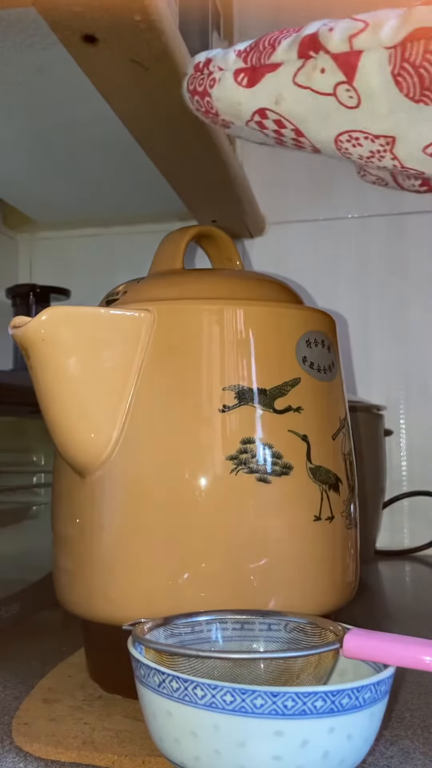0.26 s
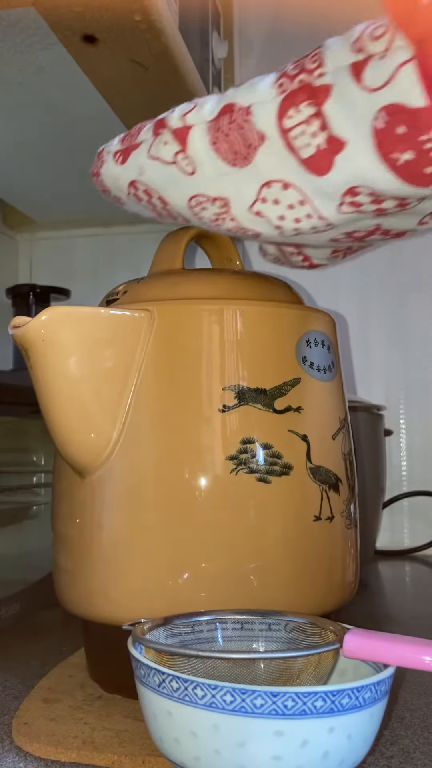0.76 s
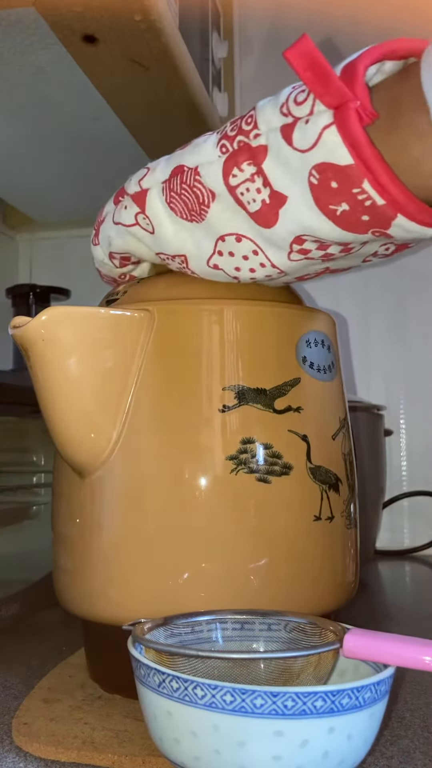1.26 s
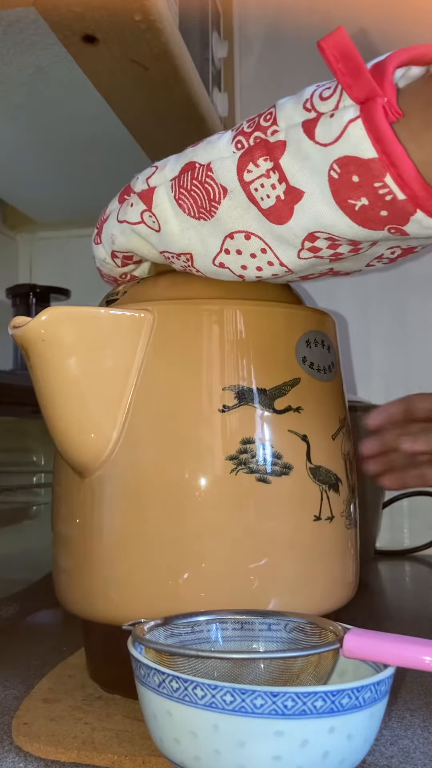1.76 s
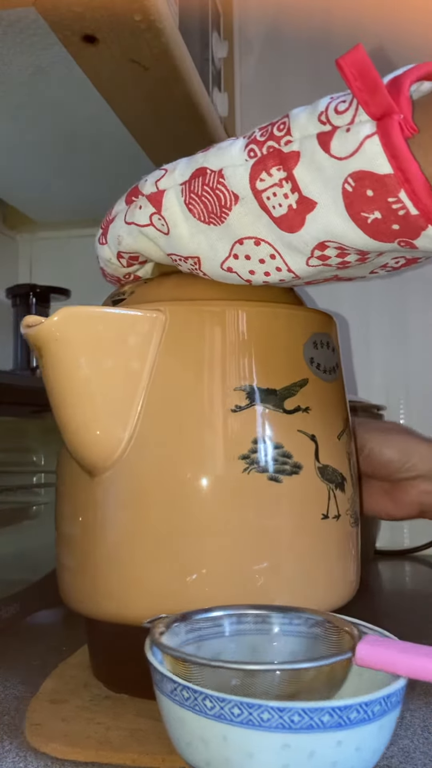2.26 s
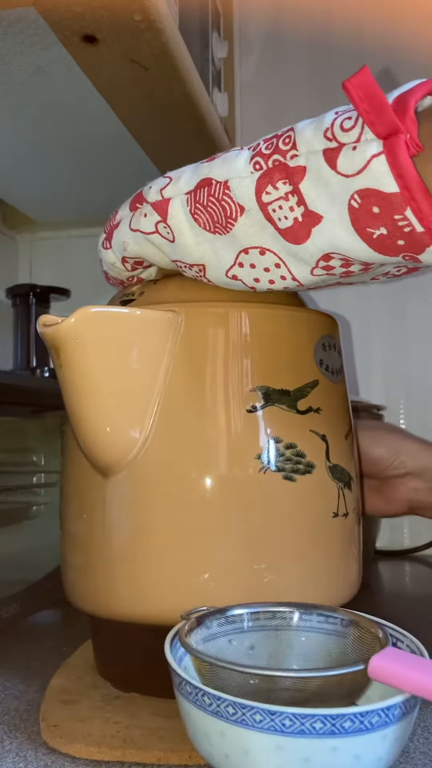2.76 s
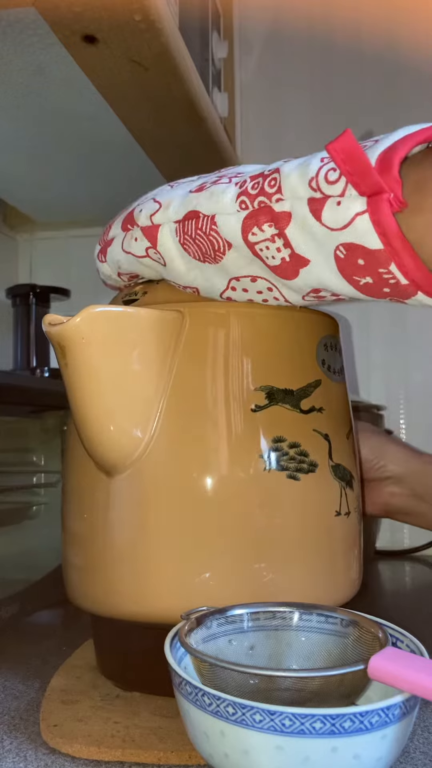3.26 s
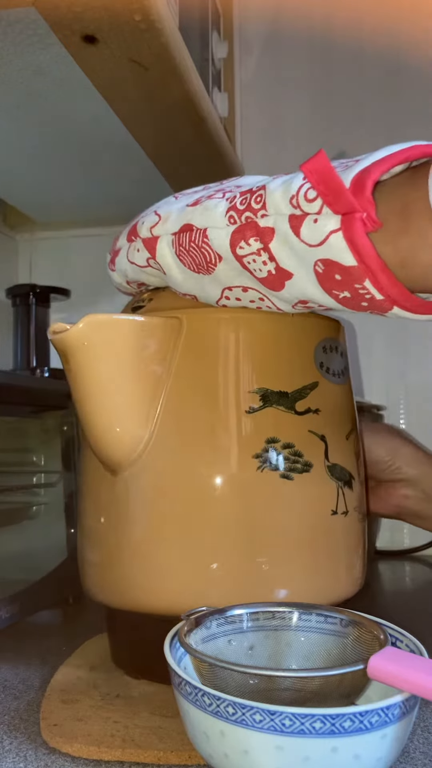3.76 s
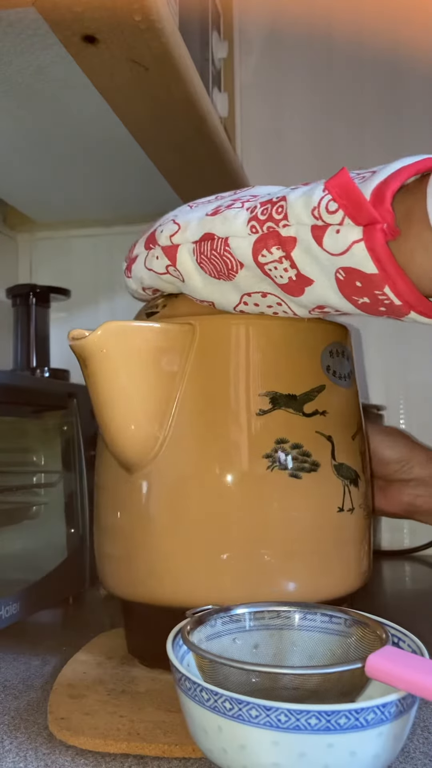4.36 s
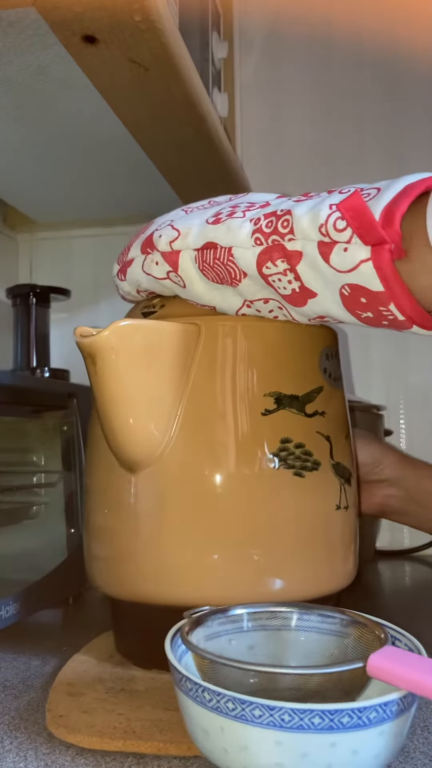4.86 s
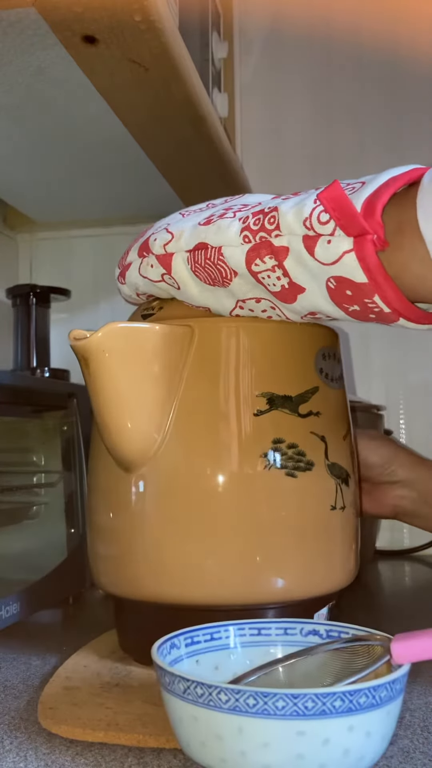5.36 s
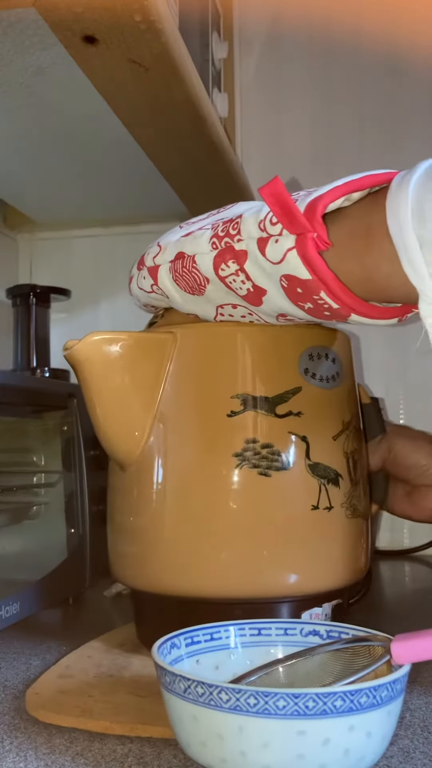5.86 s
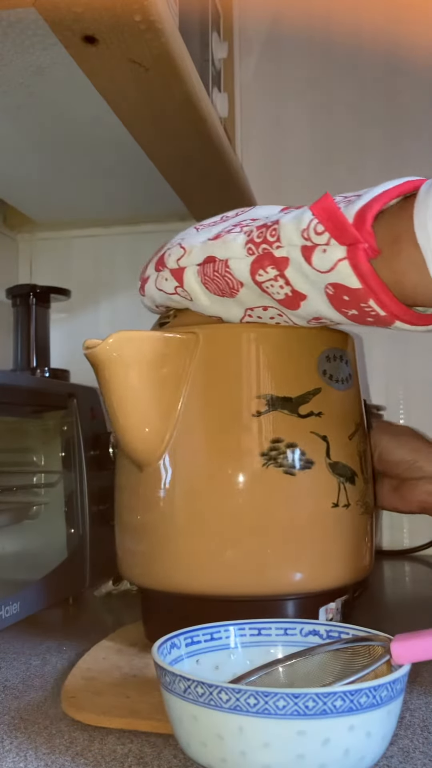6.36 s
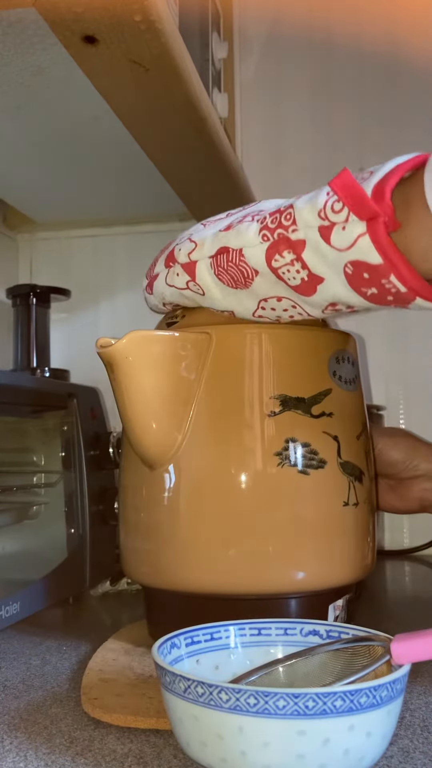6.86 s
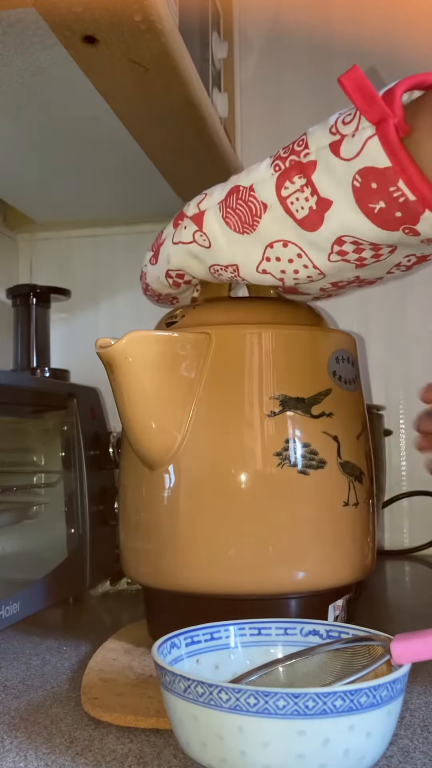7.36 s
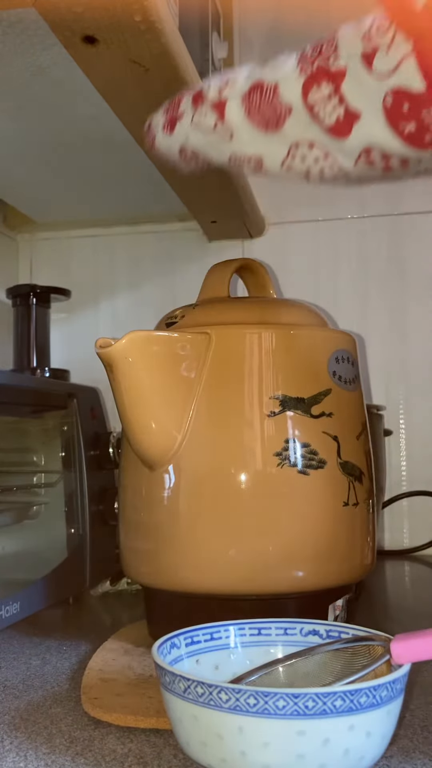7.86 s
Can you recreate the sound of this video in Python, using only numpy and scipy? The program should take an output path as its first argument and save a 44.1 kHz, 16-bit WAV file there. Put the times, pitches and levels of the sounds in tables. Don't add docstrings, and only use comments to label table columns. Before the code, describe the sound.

Handling of a heavy ceramic pot on a wooden board, picked up closely by a phone in a dry kitchen. Faint taps and fabric rubbing lead to a brief hollow double knock with clinks. After a quiet stretch of soft rustle, a stronger bump sets a wire strainer chattering on a china bowl. Quiet touches continue until the strainer strikes the rim loudly, ringing briefly. The low hum pulses unevenly beneath.

```python
import sys
import numpy as np
from scipy import signal
from scipy.fft import rfft, irfft, next_fast_len
from scipy.io import wavfile
from scipy.ndimage import uniform_filter1d

SR = 44100
rng = np.random.default_rng(int(sys.argv[2]) if len(sys.argv) > 2 else 0)


def nominal_scale(level):
    x = np.asarray(level, float) / 20
    return 10 ** x


def waveform_to_disk(signal):
    frames = np.transpose(np.atleast_2d(signal))
    scaled = np.clip(frames, -1, 1) * 32767
    samples = np.round(scaled).astype(np.int16)
    wavfile.write(sys.argv[1], SR, samples)


N = 358268

LIFT_S = 7.8

# (time [s], peak [dB], then against it: two lowest modes [dB], third [dB], top [dB])
CLINKS = [(2.3083, -29, -13, -6, -18), (2.377, -42.5, -16.5, -32, -14), (2.439, -57, -7, -5, -12),
          (2.478, -55, -6, -23, -3), (2.527, -56.5, 0.5, -19, -2.5), (2.6017, -60, -0.5, -16, -6),
          (2.6545, -59, -5, -27, -3), (2.7024, -66.5, -4, -18, 3), (2.7415, -74, -8, -8, 8),
          (4.9531, -26.5, -8, -8.5, 9), (4.9644, -21, -0.5, -25, 4), (4.9745, -24, -8.5, -24, 0),
          (4.983, -22, -6, -24, 0), (4.988, -24, -8, -24, 0), (5.0722, -27, -12, -17, -10),
          (5.0834, -23, -11.5, -30.5, -6), (5.1339, -37, -6.5, -23, -12), (5.1435, -36, -11.5, -26, -10),
          (5.1635, -34.5, -8, -13, -16), (5.177, -37.5, 0, -16, -9), (5.192, -35, -1.5, -8, -6),
          (5.2208, -38, 3.5, -12, -1), (5.2252, -37.5, -3, -20, -13), (5.2603, -33.5, -4.5, -10, -17),
          (5.275, -36.5, -7, -8.5, -9.5), (5.339, -47.5, 1, -15, -5), (7.9415, -12, -8, -27, -2),
          (7.9492, -18.5, -12, -27, -5.5), (7.96, -15.5, -17.5, -34, -14)]
# (time of peak [s], swells [s], fades [s], high modes [dB], low modes [dB])
CHATTER = [(2.31, .03, 0.02, -46.5, -39), (2.384, .03, 0.029, -65, -61.5), (2.441, 0.028, 0.053, -54, -59),
           (2.7, .2, 0.092, -84, -84.5), (3.96, .06, 0.085, -75, -91.5), (4.85, 0.092, .1, -80, -84.5),
           (4.977, 0.026, 0.066, -34, -44), (5.089, 0.0072, 0.05, -33, -52.5),
           (5.166, 0.021, 0.031, -42.5, -58), (5.192, 0.024, 0.014, -41, -41.5),
           (5.226, 0.034, 0.079, -46, -43.5), (5.267, 0.027, 0.068, -57, -49.5),
           (5.35, .04, 0.038, -67, -52), (6.87, 0.16, 0.066, -87, -78.5),
           (7.07, 0.056, 0.037, -75.5, -90.5), (7.93, 0.035, 0.0095, -62, -60.5),
           (7.947, 0.0078, 0.0055, -48, -23)]
BOWL_HZ = [1633, 1690, 2962, 3040, 4890, 4899, 7378, 7260, 7530, 7760, 8053, 8840, 9800, 10325, 10290,
           12840, 13015, 13460, 13650, 14220, 15722]
# (level [dB], time to fade 60 dB [s])
BOWL_MODES = [(1.5, 0.28), (2.5, 0.1), (-1.5, 0.44), (0, 0.1), (2.5, 0.19), (10, 0.47), (2.5, 0.065),
              (-14, 0.07), (-6, .025), (-15, 0.061), (-23, 0.074), (-26.5, 0.16), (-24, .12), (-5, 0.12),
              (-13, 0.22), (-12.5, 0.13), (-12, 0.079), (-17, .06), (-10.5, 0.076), (-32, .1), (-10.5, .1)]
# (extra level [dB], time to fade 60 dB [s])
LIFTED_MODES = [(2, 0.51), (0, .1), (0, 0.43), (3, .05), (9, 0.28), (3, .3), (1, 0.029), (-1.5, .033),
                (-4, .012), (-1, .03), (1, .15), (1, 0.18), (2, .12), (0.5, .13), (-4, 0.22), (-6.5, .2),
                (-3, 0.11), (5.5, .07), (0.5, 0.12), (7, .14), (-10, .17)]
STIFF_MODES_HZ = 12840, 13015, 14220, 15722
# (time [s], peak [dB])
SNAPS = [
    (2.3088, -36),
    (2.377, -50),
    (5.0729, -15.5),
    (7.9419, -9.5),
    (7.949, -18),
    (7.96, -12),
]
# (time of peak [s], swells [s], fades [s], level [dB])
SQUEALS = [
    (2.249, 0.1, .06, -68),
    (4.929, .05, .02, -66),
]
# (time [s], peak [dB], pitch [Hz], time to fade 60 dB [s], crack [dB])
KNOCKS = [(0.386, -55, 800, 0.049, -14), (0.652, -54.5, 1080, 0.078, -13), (0.709, -52, 1620, 0.043, -13),
          (0.808, -60, 2120, 0.04, 4), (1.182, -47, 662, 0.058, -54), (2.095, -67, 1910, 0.03, -2),
          (2.241, -39.5, 1100, 0.21, -64), (2.257, -23, 932, 0.076, -42), (2.265, -18.5, 812, 0.04, -37),
          (2.286, -17, 1850, 0.029, -39), (2.287, -28.5, 817, 0.048, -45.5), (2.294, -33, 1700, 0.13, -42),
          (2.305, -29.5, 860, 0.043, -44), (3.03, -48, 1970, 0.06, -13), (3.045, -55, 1970, 0.07, -43),
          (3.031, -53, 1095, 0.065, -30), (3.04, -55, 737, 0.14, -46.5), (3.119, -69.5, 3200, 0.055, -2.5),
          (3.468, -60, 1890, 0.039, 5), (4.633, -37, 666, 0.036, -31.5), (4.78, -57.5, 1825, 0.038, -14.5),
          (4.951, -16.5, 1637, 0.18, -22.5), (4.95, -17.5, 1140, 0.062, -40),
          (4.966, -21, 863, 0.075, -39.5), (4.985, -23, 1630, .1, -40.5), (5.006, -25, 1120, 0.055, -41),
          (5.009, -24.5, 837, 0.15, -29.5), (5.072, -28, 1712, 0.085, -36.5),
          (5.624, -44.5, 677, 0.034, -28.5), (5.749, -54, 2225, 0.018, -24),
          (5.826, -61, 2056, 0.016, -15.5), (3.471, -63, 4260, 0.06, -20), (4.441, -60, 1500, .04, -15),
          (5.727, -56, 900, .04, -25), (7.087, -52.5, 964, 0.11, 3.5), (7.139, -44.5, 2027, 0.048, -22),
          (7.145, -37, 789, 0.02, -11), (7.616, -49.5, 1687, 0.043, -27), (7.617, -51.5, 900, .05, -30),
          (4.953, -23.5, 1330, .06, -45), (4.968, -23.5, 1630, 0.082, -44.5),
          (5.004, -25.5, 1330, .06, -45), (7.943, -47.5, 740, .12, -37), (8.02, -53.5, 1000, 0.1, -42)]
# (time [s], peak [dB], pitch [Hz], time to fade 60 dB [s], crack [dB])
DULL_KNOCKS = [(1.052, -49.5, 194, 0.065, -45), (1.13, -42.5, 337, 0.11, -49),
               (1.339, -48, 227, 0.095, -45), (2.262, -22.5, 492, 0.056, -47.5),
               (2.288, -27, 499.5, 0.081, -48), (2.295, -27.5, 350, 0.12, -53.5),
               (2.401, -40, 500, 0.084, -39), (3.807, -36, 232, 0.081, -45),
               (4.949, -20, 497, 0.057, -44.5), (4.944, -18.5, 248, 0.14, -44.5),
               (4.947, -18, 350, 0.11, -50.5), (4.976, -35, 81.6, 0.44, -50), (5.008, -22, 263, 0.092, -52),
               (5.267, -30.5, 446, 0.06, -45), (5.729, -45, 358, 0.076, -47.5),
               (5.752, -45.5, 269, 0.1, -42), (2.29, -26, 250, 0.14, -50), (7.94, -45.5, 261, 0.19, -50),
               (7.942, -48, 502, .1, -50), (8.025, -50.5, 517, .12, -50)]
# (pitch [Hz], level [dB], time to fade 60 dB [s])
POT_MODES = [(606, -7.5, 0.17), (860, -4.5, 0.027), (1304.5, -4, 0.055), (1675, -11, 0.055),
             (1970, -7, 0.031), (3100, -13, 0.03), (3910, -18, 0.021), (4600, -18.5, .03)]
# (time [s], swells [s], boom [dB], dull clatter [dB], bright clatter [dB])
BUMPS = [(2.226, 0.12, -57, -59, -79.5), (2.265, 0.028, -51, -30, -63), (2.295, 0.032, -32.5, -36, -33.5),
         (2.441, 0.055, -48.5, -66, -61), (4.948, 0.008, -59.5, -40.5, -30.5),
         (4.953, 0.0044, -23, -21.5, -12.5), (5.014, 0.036, -28.5, -29, -28),
         (5.078, .015, -39, -42.5, -34.5), (5.2, 0.086, -47.5, -67, -47), (5.19, .01, -60, -55, -42),
         (5.271, 0.012, -39.5, -42, -40)]
# (frequency [Hz], level per Hz [dB])
BOOM = [(24, -52), (40, -17), (76, -1.5), (204, -15.5), (226, -4.5), (283, -6), (438, -3.5), (578, -1.5),
        (663, -19.5), (800, -10.5), (1040, -36), (1760, -120)]
# (frequency [Hz], level per Hz [dB])
DULL_CLATTER = [(450, -12), (650, -2.5), (900, -1), (1200, -1), (1600, -19)]
# (frequency [Hz], level per Hz [dB])
BRIGHT_CLATTER = [(1000, -9), (1400, -3.5), (1650, 1), (2300, -2.5), (3500, -10), (6000, -31), (9000, -27),
                  (13000, -36)]
# (time of peak [s], swells [s], fades [s], level above 8 kHz [dB], level below it [dB])
STROKES = [(.005, 0.0079, 0.044, -79, -69.5), (.27, 0.013, 0.11, -70.5, -73), (.4, 0.05, 0.061, -82, -64),
           (.66, 0.064, 0.069, -73, -56.5), (0.722, 0.049, 0.064, -64, -51), (.78, .1, 0.13, -66.5, -62),
           (.818, 0.027, 0.063, -62.5, -51.5), (1.12, 0.1, 0.13, -69.5, -80),
           (1.868, 0.04, 0.094, -60, -56), (1.95, 0.071, 0.091, -57.5, -54),
           (2.095, 0.0027, 0.039, -61, -87), (2.2, 0.34, 0.16, -74, -70.5),
           (2.351, .15, 0.36, -74.5, -62.5), (2.92, 0.057, 0.17, -69.5, -59),
           (3.032, .005, 0.026, -63, -50.5), (3.47, 0.0079, 0.036, -70.5, -56.5),
           (3.69, 0.11, .1, -62.5, -50.5), (3.774, 0.078, 0.064, -53, -45.5), (3.86, .1, 0.09, -62, -52),
           (4.389, 0.15, 0.3, -70.5, -56), (4.9, 0.16, 0.12, -71, -67), (5.48, 0.12, 0.21, -68, -54),
           (5.73, 0.18, 0.17, -69.5, -70), (6.2, 0.068, 0.11, -70, -61), (6.38, 0.18, 0.18, -74, -66.5),
           (6.89, 0.059, 0.13, -84, -70), (7.085, 0.024, 0.057, -68, -77),
           (7.147, 0.068, 0.091, -57.5, -57), (7.62, 0.042, 0.062, -99, -74),
           (7.99, 0.05, 0.12, -55.5, -63)]
# (frequency [Hz], level per Hz [dB])
RUSTLE = [(500, -8), (1000, -6), (2000, 4.5), (3500, -3.5), (5000, -3.5), (5800, -8), (6600, -8),
          (8000, -11.5)]
# (frequency [Hz], level per Hz [dB])
RUSTLE_TOP = [(8000, -1), (10000, -2.5), (12000, -15), (14000, -18), (15800, -27)]
# (frequency [Hz], level per Hz [dB])
HUM = [(15, -47.5), (25, -12.5), (98, -4.5), (172, -15), (283, -9), (324, -16), (364, -8.5), (674, -25.5),
       (973, -27.5), (1160, -28.5), (1430, -29.5), (1540, -35), (2500, -38.5), (3250, -63.5), (5500, -120)]
# (frequency [Hz], width [Hz], level [dB])
HUM_PEAKS = [(94, 10, 7)]
# (frequency [Hz], level per Hz [dB])
HISS = [(300, 0), (700, -5), (1500, -26.5), (2600, -12), (3200, -23), (7000, -28), (9000, -18.5),
        (12000, -29), (14000, -33.5), (14800, -50.5)]
# (opens [s], shuts [s], gain at first [dB], gain at last [dB])
OPENINGS = [(0.0, 0.058, -2.5, -1), (0.211, 0.406, -1.5, -1), (0.47, 0.881, -3.5, -0.8),
            (1.095, 1.201, -15, -7.5), (1.331, 1.398, -6.5, -13), (1.5, 1.62, -23, -20),
            (1.824, 1.95, -27, -15.5), (2.107, 2.24, -4.5, -6), (2.267, 2.78, 0.5, -7.5),
            (2.798, 2.926, -14, -15), (3.027, 3.2, -11, -10.5), (3.374, 4.117, 1, 0.5),
            (4.14, 4.409, -7.5, -13.5), (4.434, 4.641, -1.5, 3), (4.775, 4.834, -9.5, -4.5),
            (4.953, 5.713, 3.5, -5.5), (5.727, 5.85, 6, -3.5), (5.876, 6.041, -8, -13.5),
            (6.113, 6.18, -5.5, -10.5), (6.278, 7.164, 0, 0), (7.18, 7.256, -5.5, -18.5),
            (7.444, 7.691, -0.5, -0.5), (7.739, 8.022, -0.5, 1), (8.045, 8.11, -3, -23)]
# (frequency [Hz], phase lead [rad], likeness of diffuse sound [0-1])
PORTS = [(0, 0, 1), (250, -3, 1), (500, -6.4, .9), (640, -8.4, .55), (800, -12.8, .5), (1000, -16.3, .5),
         (1150, -16.5, .55), (1300, -14.9, .7), (1640, -14.2, .7), (2500, -15.5, .55), (3000, -14.9, .55),
         (4000, -14.5, .6), (4900, -15, .75), (5700, -15.6, 1), (6740, -17.1, .75), (8666, -20.6, 1),
         (10200, -20.6, 1), (11600, -22.1, 1), (12200, -22.6, 0.9), (14100, -24.6, 0.96), (22050, -24.6, 1)]
# (time [s], frequency [Hz])
MONO_BELOW = [(0, 450), (1.45, 400), (1.55, 60), (3.03, 60), (3.1, 260), (3.4, 380), (3.8, 440), (4.8, 480),
              (5.1, 520), (6, 620), (6.6, 520), (7.2, 420), (7.5, 300), (7.8, 230), (8.1, 170)]
# (time [s], level [dB])
RIGHT_BASS = [
    (.5, 4),
    (1.0, 3),
    (1.4, 0),
]


def rms_one(x):
    return x / np.sqrt(np.mean(x ** 2) + 1e-20)


def drift(rate):
    r = np.exp(-40 * np.pi * rate / SR)
    slow = signal.lfilter([1], [1, -2 * r, r * r], rng.standard_normal(N // 20 + 2002))[2000:]
    return np.interp(np.arange(N) / 20, np.arange(len(slow)), rms_one(slow))


def grains(per_s, spread_db):
    sizes = nominal_scale(spread_db * np.minimum(rng.exponential(1, N), 4))
    sizes = sizes * (rng.random(N) < per_s / SR)
    return rms_one(sizes * np.sign(rng.random((2, N)) - .5))


def clicks_at(s, peak_db):
    clicks = np.zeros(N)
    clicks[np.round(np.asarray(s) * SR).astype(int)] = nominal_scale(peak_db)
    return clicks


def ring(clicks, hz, t60):
    r, w = nominal_scale(-60 / (t60 * SR)), 2 * np.pi * hz / SR
    return signal.lfilter([0, np.sin(w)], [1, -2 * r * np.cos(w), r * r], clicks + 1e-18)


def soften(clicks, hz, width_hz):
    return signal.lfilter(*signal.iirpeak(hz, hz / width_hz, fs=SR), clicks + 1e-18)


def swells(s, rise_s, fall_s, level_db, curve):
    t, power = np.arange(0, N + 16, 16) / SR, 1e-12
    for at, rise, fall, db in np.broadcast(s, rise_s, fall_s, level_db):
        away = np.where(t < at, (at - t) / rise, (t - at) / fall)
        power = power + nominal_scale(2 * (db - 20 * away ** curve))
    return np.interp(np.arange(N) / SR, t, 10 * np.log10(power))


def coloured(x, spectrum, peaks=()):
    size = next_fast_len(N)
    hz = np.fft.rfftfreq(size, 1 / SR) + 1e-3
    at, db = np.transpose(spectrum)
    gain_db = np.interp(np.log(hz), np.log(at), db, left=-90, right=-90)
    for peak_hz, width_hz, peak_db in peaks:
        gain_db += peak_db / (1 + (2 * (hz - peak_hz) / width_hz) ** 2)
    port_hz, _, likeness = np.transpose(PORTS)
    alike = np.clip(np.interp(hz, port_hz, likeness), 0, 1)
    shared, apart = rfft(x, size) * nominal_scale(gain_db)
    both = np.sqrt(1 + alike) * shared + np.sqrt(1 - alike) * apart * [[1], [-1]]
    return rms_one(irfft(both, size)[:, :N])


def bowl():
    s, peak_db, lowest_db, third_db, top_db = np.transpose(CLINKS)
    chatter_s, rise_s, fall_s, *chatter_levels = np.transpose(CHATTER)
    high_db, low_db = [swells(chatter_s, rise_s, fall_s, db, curve=0.81) for db in chatter_levels]
    lift = round(LIFT_S * SR)
    low_db[lift:] -= 9
    touches = grains(1000, 1.9)[0]
    moments = np.flatnonzero(touches)
    scatter_db = 0.63 * rng.standard_normal((len(s), len(BOWL_MODES)))
    out = np.zeros(N)
    for k, (hz, (level_db, t60)) in enumerate(zip(BOWL_HZ, BOWL_MODES)):
        part = np.searchsorted([2300, 4000, 6000, 9000], hz)
        stiff = np.min(np.abs(np.log(hz / np.array(STIFF_MODES_HZ)))) < .004

        tilt_db = [lowest_db, lowest_db - 5, third_db, 0, top_db + 9.0][part]
        tilt_db = tilt_db + .8 * stiff * np.minimum(peak_db + 21.5, 0)
        tilt_db = tilt_db + .3 * (hz > 13200) * np.minimum(peak_db + 30.5, 0)
        clicks = clicks_at(s, peak_db + level_db + tilt_db - 6.5 + scatter_db[:, k])

        chatter_db = low_db - 19.5 if hz < 4000 else high_db - (40 if hz < 6000 else 23)
        chatter_db = chatter_db - 10 * stiff + 6.5 * (part == 1) * (np.arange(N) < lift)
        chance = touches[moments] * rng.standard_normal(len(moments))
        clicks[moments] += nominal_scale(chatter_db[moments] + level_db) * chance
        clicks = soften(clicks, hz, 900)

        damping = 0.26 if hz < 4000 else .6 if hz < 6000 else 1
        uneven = nominal_scale(4 * drift(16)) if hz < 6000 else np.ones(N)
        out[:lift] += uneven[:lift] * ring(clicks[:lift], hz, t60 * damping)

        choke_db = [-10.5, -14.5, -9.5][part] if part < 3 else 0
        choke_db = np.interp(np.arange(lift, N) / SR, [7.963, 7.963 + 0.014], [0, choke_db])
        extra_db, free_t60 = LIFTED_MODES[k]
        out[lift:] += nominal_scale(extra_db + choke_db) * ring(clicks[lift:], hz, free_t60)
    out += wire_snaps() + rim_cracks(s, peak_db)
    return signal.sosfilt(signal.butter(3, 1100., "high", fs=SR, output="sos"), out)


def wire_snaps():
    hz, width_hz, t60 = 7620, 1600, 0.0087
    return nominal_scale(1.5) * ring(soften(clicks_at(*np.transpose(SNAPS)), hz, width_hz), hz, t60)


def rim_cracks(s, peak_db):
    clicks = clicks_at(s, -14 + 1.1 * (peak_db + 12.5))
    fade = signal.lfilter([1], [1, -nominal_scale(-60 / (0.018 * SR))], clicks)
    band = signal.butter(4, [1700, 10500], "band", fs=SR, output="sos")
    return signal.sosfilt(band, fade * rng.standard_normal(N))


def squeal():
    level_db = swells(*np.transpose(SQUEALS), curve=1.5)
    return nominal_scale(level_db) * rms_one(ring(rng.standard_normal(N), hz=13015, t60=.03))


def knocks():
    out, t = np.zeros(N + SR), np.arange(SR // 4) / SR
    events = DULL_KNOCKS + KNOCKS
    noises = rng.standard_normal((len(events), 2, len(t)))
    bright = signal.butter(2, [2500, 11000], "band", fs=SR, output="sos")
    for (s, peak_db, hz, t60, crack_db), (puff, snap) in zip(events, noises):
        fade = nominal_scale(-60 * t / max(t60, .01)) * np.minimum(t * hz / 5.1, 1)
        band = signal.butter(2, [hz / 2.6, hz * 1.3], "band", fs=SR, output="sos")
        body = 0.78 * np.sin(2 * np.pi * hz * t) + 0.16 * rms_one(signal.sosfilt(band, puff))
        crack = nominal_scale(crack_db + 5.0 - 60 * t / 0.027) * signal.sosfilt(bright, snap)
        i = round(s * SR)
        out[i:i + len(t)] += nominal_scale(peak_db + 4.0) * (fade * body + crack)
    return out[:N]


def pot():
    s, peak_db, _, _, crack_db = np.transpose(KNOCKS)
    scatter_db = 1.7 * rng.standard_normal((len(s), len(POT_MODES)))
    light_db = 0.16 * np.maximum(-26.0 - peak_db, 0)
    out = np.zeros(N)
    for k, (hz, level_db, t60) in enumerate(POT_MODES):
        soft_db = 0.29 * np.minimum(crack_db + 25.5, 0) * np.log2(hz / 400)
        clicks = clicks_at(s, peak_db + level_db - 5.5 + soft_db + light_db + scatter_db[:, k])
        out += ring(clicks, hz, t60)
    return signal.sosfilt(signal.butter(2, 5200., fs=SR, output="sos"), out)


def kitchen(x):
    t60 = 0.059
    t = np.arange(SR // 2) / SR
    tail = rng.standard_normal((2, len(t))) * nominal_scale(-60 * t / t60) * (t > .002)
    tail = signal.sosfilt(signal.butter(2, [400, 2500], "band", fs=SR, output="sos"), tail)
    tail = tail / np.sqrt(np.sum(tail ** 2) / 2)
    return signal.fftconvolve(x[None], tail, axes=1)[:, :N]


def worktop():
    s, rise_s, *levels_db = np.transpose(BUMPS)
    fades_s = 0.14, .07, .08
    boom_db, dull_db, bright_db = [swells(s, rise_s, fade_s, db, curve=0.82)
                                   for fade_s, db in zip(fades_s, levels_db)]
    boom = nominal_scale(boom_db - 1.5) * coloured(rng.standard_normal((2, N)), BOOM)
    contacts, lumps_db = grains(3500, 2.5), 2.4 * drift(70)
    dull = nominal_scale(dull_db + 0.5 + lumps_db) * coloured(contacts, DULL_CLATTER)
    bright = nominal_scale(bright_db + 0.5 + lumps_db) * coloured(contacts, BRIGHT_CLATTER)
    struck = nominal_scale(bright_db + lumps_db) * contacts[0]
    wall = sum(nominal_scale(db - 26.0) * ring(struck, hz, t60) for hz, db, t60 in POT_MODES)
    return boom + dull + bright + nominal_scale(-4.5) * wall


def suppressor():
    shut_db, open_db_per_s, close_db_per_s = -18.0, 4000.5, 509
    t, gain_db = np.arange(N) / SR, np.full(N, shut_db)
    for opens, shuts, first_db, last_db in OPENINGS:
        held_db = np.interp(t, [opens, shuts], [first_db, last_db])
        edge_db = open_db_per_s * np.maximum(opens - t, 0) + close_db_per_s * np.maximum(t - shuts, 0)
        gain_db = np.maximum(gain_db, held_db - edge_db)
    return gain_db


def waver(x):
    hz, _, frames = signal.stft(x, SR, nperseg=1024)
    chance = uniform_filter1d(rng.standard_normal(frames.shape[1:]), size=2, axis=0)
    chance = uniform_filter1d(chance, size=8, axis=1)
    gain = rms_one(nominal_scale(4 * rms_one(chance)))
    frames = frames * np.where(hz[:, None] < 8000, gain, 1)
    return signal.istft(frames, SR, nperseg=1024)[1][:, :N]


def background():
    gate_db = suppressor()
    s, rise_s, fall_s, above_db, below_db = np.transpose(STROKES)
    curve, stretch = 1.8, 1.206
    top_db = swells(s, rise_s, fall_s, above_db, curve)
    below_db = swells(s, stretch * rise_s, stretch * fall_s, below_db, curve)
    white = rng.standard_normal((3, 2, N))
    hum = nominal_scale(-53 + gate_db + 0.52 * drift(24)) * coloured(white[0], HUM, HUM_PEAKS)
    hiss = nominal_scale(-74) * coloured(white[1], HISS)
    fibres = white[2] + 0.36 * grains(1500, 3.5)
    flicker_db = 2.1 * drift(24)
    level = np.hypot(nominal_scale(below_db), nominal_scale(-81.5)) * nominal_scale(1.4 * np.minimum(gate_db, 0))
    rustle = level * nominal_scale(0.5 + flicker_db) * coloured(fibres, RUSTLE)
    rustle_top = nominal_scale(top_db + 1.0 + flicker_db) * coloured(fibres, RUSTLE_TOP)
    return waver(hum + hiss + rustle) + rustle_top


def scene():
    china, clay = bowl(), knocks() + pot()
    echoes = kitchen(nominal_scale(-16.5) * china + nominal_scale(-12) * clay)
    return china + squeal() + clay + echoes + worktop() + background()


def low_pass(x):
    return signal.sosfilt(signal.butter(12, 16840, fs=SR, output="sos"), x)


def record(dry):
    size = next_fast_len(N + 999)
    port_hz, lead_rad, _ = np.transpose(PORTS)
    turn = np.exp(1j * np.interp(np.fft.rfftfreq(size, 1 / SR), port_hz, lead_rad))
    left = dry[0]
    right = irfft(rfft(dry[1], size) * turn, size)[:N]

    lean = nominal_scale(np.interp(np.arange(N) / SR, *np.transpose(RIGHT_BASS)))
    hz, s, apart = signal.stft(lean * left - right, SR, nperseg=2048)
    shared = 1 / (1 + (hz[:, None] / np.interp(s, *np.transpose(MONO_BELOW))) ** 9)
    right = right + signal.istft(apart * shared, SR, nperseg=2048)[1][:N]

    mix = 0.9 * np.tanh(np.array([left, right]) / 0.9)
    mix = signal.sosfilt(signal.cheby2(8, 50, 16900, fs=SR, output="sos"), mix)
    mix = signal.sosfilt(signal.butter(3, 45., "high", fs=SR, output="sos"), mix)
    return low_pass(mix)


dry = scene()
out = record(dry)
waveform_to_disk(out)
```